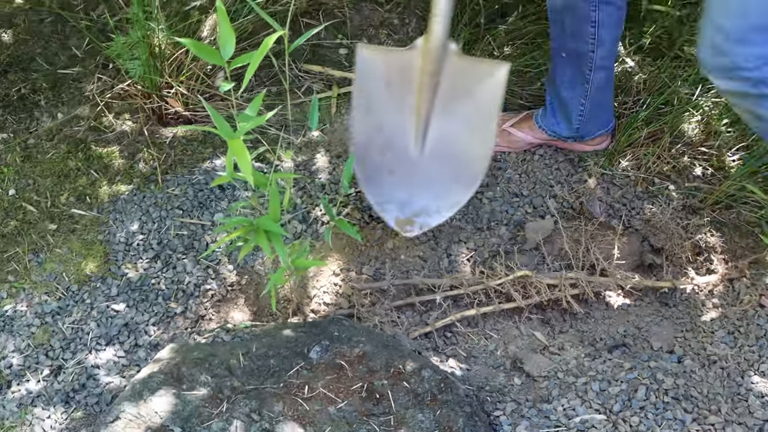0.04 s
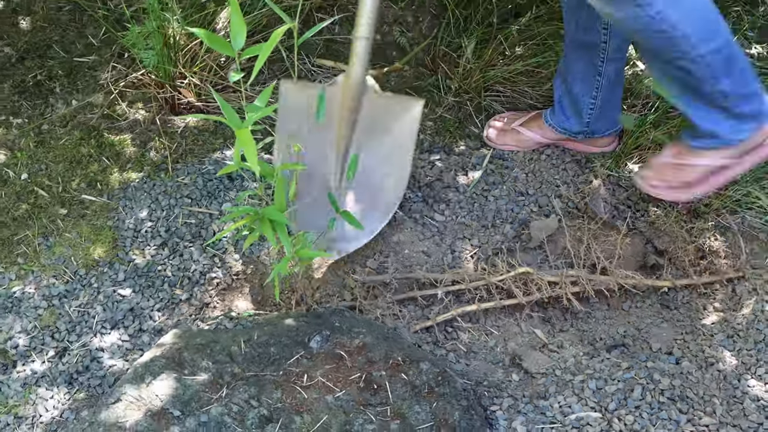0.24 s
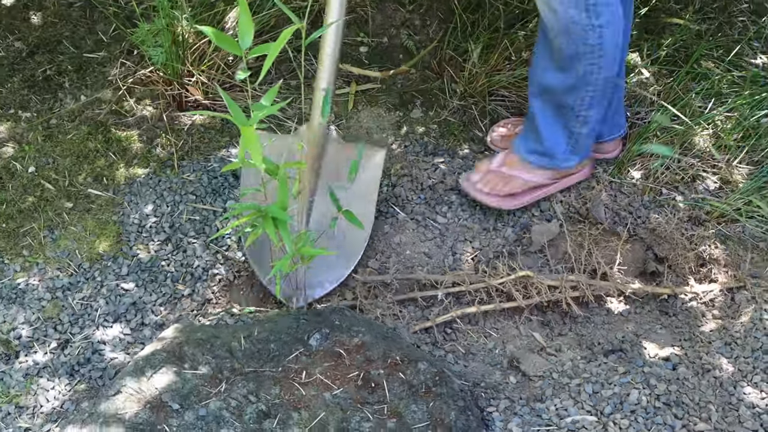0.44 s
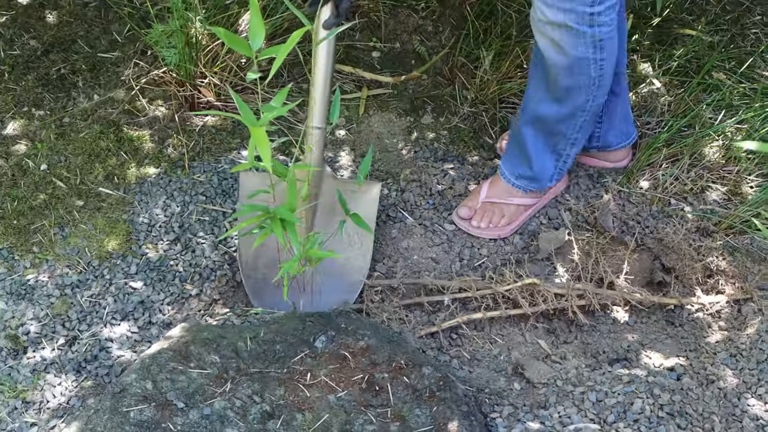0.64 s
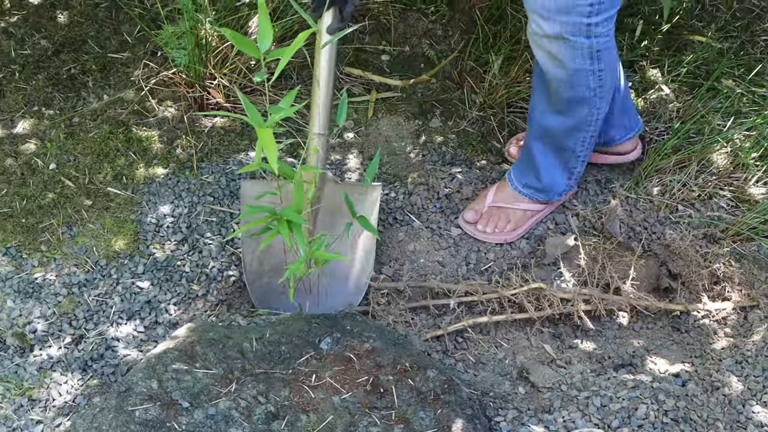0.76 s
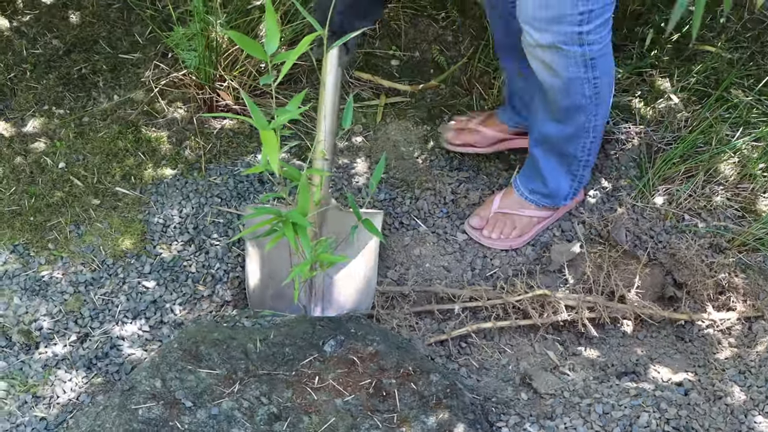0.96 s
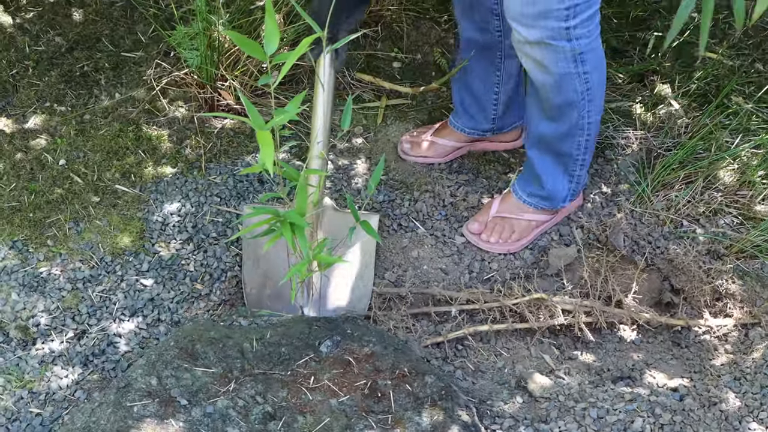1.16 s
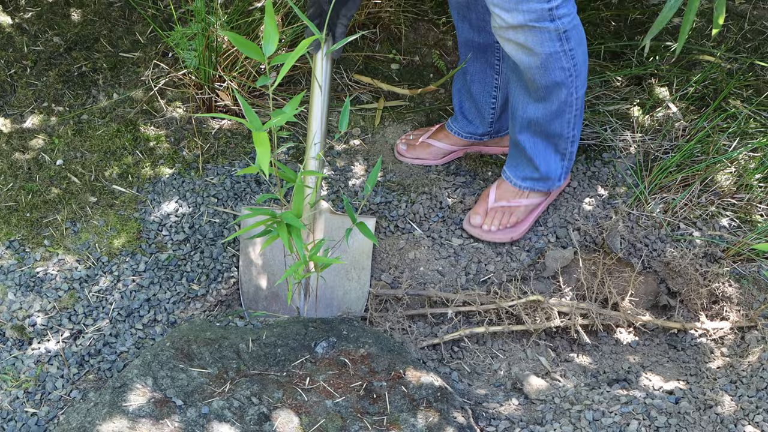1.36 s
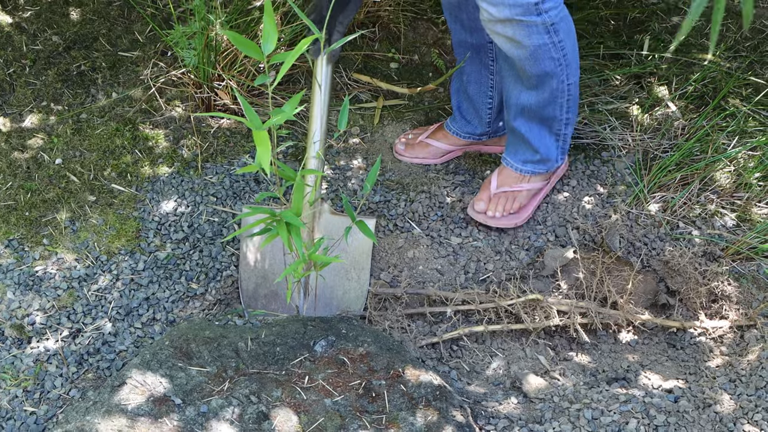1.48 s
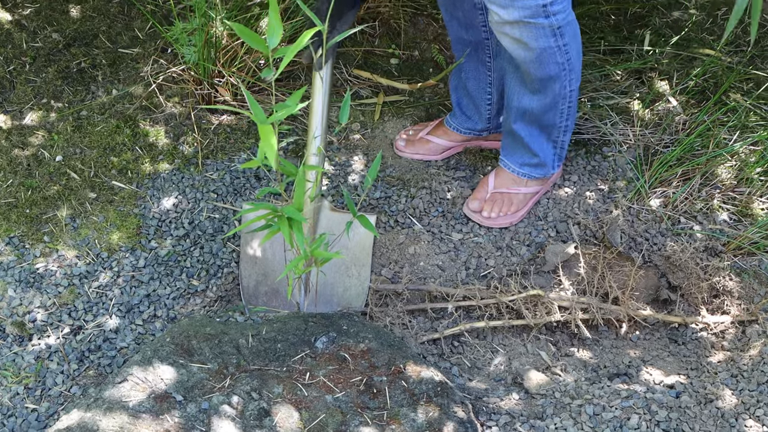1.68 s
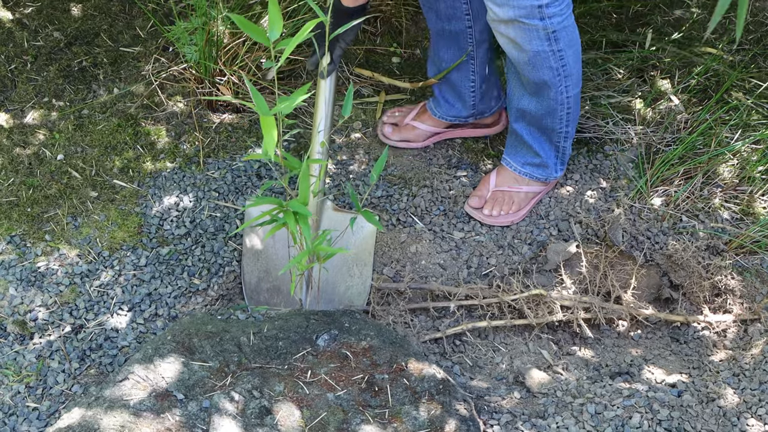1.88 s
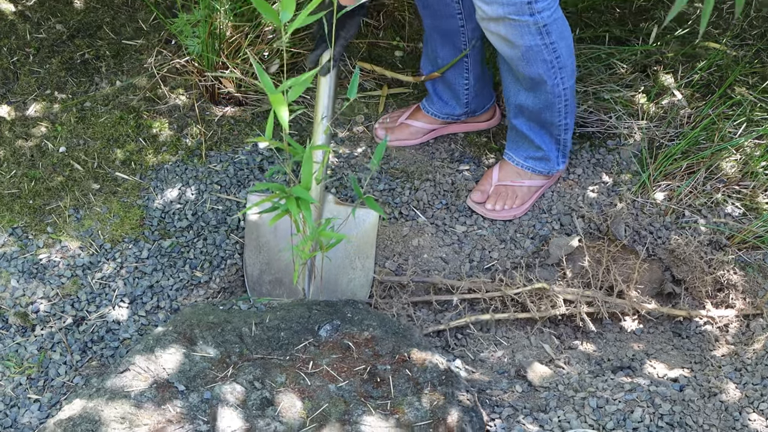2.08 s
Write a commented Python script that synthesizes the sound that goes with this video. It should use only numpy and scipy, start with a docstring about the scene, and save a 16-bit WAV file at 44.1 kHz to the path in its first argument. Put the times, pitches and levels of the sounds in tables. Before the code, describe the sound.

A steel spade scrapes and bites into gravelly soil, stones knocking and crunching under shifting feet

```python
"""In a garden, a steel spade is set on gravelly soil and pushed in as sandalled feet shift on the gravel.
Random grit clicks ring the blade's modes under a treble hiss and a low push of soil; the gravel
crunches as many small ringing contacts; stones knock as a ring, a snap and a scatter of grit.
Sprays are coloured clicks that die away. Soft low thuds, a sandal's creak and a bright clack of blade
on stone are added, over shaped noise for the faint air."""
import sys
import numpy as np
from scipy import signal
from scipy.fft import rfft, irfft, next_fast_len
from scipy.io import wavfile
from scipy.ndimage import uniform_filter1d

SR = 44100
rng = np.random.default_rng(int(sys.argv[2]) if len(sys.argv) > 2 else 0)


def makeup_ratio(level_db):
    """Linear amplitude ratio for a level in decibels (20 dB per factor of ten)."""
    decades = np.asarray(level_db, float) / 20
    return 10 ** decades


def file_out(sig):
    """Save sig as 16-bit WAV at sys.argv[1]."""
    # one column per channel
    cols = np.atleast_2d(sig).T
    # limit, then scale
    lim = np.clip(cols, -1, 1)
    pcm = np.round(lim * 32767).astype(np.int16)
    wavfile.write(sys.argv[1], SR, pcm)


N = 93492  # length in samples


def colour(x, points):
    """Causal (minimum-phase) filter with the given dB, interpolated over log frequency."""
    size = next_fast_len(N + 8192)
    hz = np.maximum(np.arange(size // 2 + 1) * SR / size, 1)
    p = np.array(points, float)
    log_gain = np.interp(np.log(hz), np.log(p[:, 0]), p[:, 1]) * np.log(10) / 20
    # folding the cepstrum onto positive time gives minimum phase
    cepstrum = irfft(log_gain, size)
    cepstrum[1:size // 2] *= 2
    cepstrum[size // 2 + 1:] = 0
    return irfft(rfft(x, size) * np.exp(rfft(cepstrum)), size)[:N]


def rms_one(x):
    """Scale to unit rms."""
    return x / np.sqrt(np.mean(x ** 2) + 1e-20)


def in_time(rows):
    """Table columns as signals, in straight lines between the rows."""
    s, *columns = np.transpose(rows)
    return [np.interp(np.arange(N) / SR, s, c) for c in columns]


def grains(per_s, spread_db):
    """Random clicks of uneven size and sign."""
    sizes = makeup_ratio(spread_db * np.minimum(rng.exponential(1, N), 5))
    signs = rng.choice([-1, 1], N)
    return sizes * signs * (rng.random(N) < per_s / SR) + 1e-18


def ring(clicks, hz, t60):
    """Two-pole resonance: a unit click starts a sine of height 1 that falls 60 dB in t60 seconds."""
    r, w = makeup_ratio(-60 / (t60 * SR)), 2 * np.pi * hz / SR
    return signal.lfilter([0, np.sin(w)], [1, -2 * r * np.cos(w), r * r], clicks)


def band(x, low_hz, high_hz):
    """Butterworth band-pass, rms 1."""
    sos = signal.butter(2, [low_hz, high_hz], "band", fs=SR, output="sos")
    return rms_one(signal.sosfilt(sos, x))


def wander(span_s):
    """Smooth chance of spread 1 that changes over span_s."""
    size = int(span_s * SR)
    return rms_one(uniform_filter1d(uniform_filter1d(rng.standard_normal(N), size), size))


def clumps(span_s=.003):
    """Gain that wanders with a spread of 2.5 dB, so that grit comes in clumps."""
    return makeup_ratio(2.5 * wander(span_s))


# Spectrum of the garden air. Each row: frequency in Hz, relative level in dB.
AIR_SPECTRUM = [(25, -8), (60, 15), (150, 11), (320, -5.5), (600, 12), (1200, -10), (4000, -2.5),
                (15000, -48)]


def garden_air():
    """Steady noise, shaped to the faint air of the garden."""
    return makeup_ratio(-56) * rms_one(colour(rng.standard_normal(N), AIR_SPECTRUM))


# Strokes of the blade, one list each.
# Each row: time in seconds, rasp level in dB, treble level in dB, soil level in dB.
BLADE_STROKES = [
    [(0, -33.5, -46, -64), (.012, -36.5, -39, -53), (.05, -42.5, -52, -40), (.08, -63, -60, -53)],
    [(.634, -53, -70, -73), (.6405, -32, -41.5, -64), (.657, -35.5, -51, -68), (.68, -44.5, -51, -53),
     (.684, -36, -38.5, -73), (.725, -35.5, -47.5, -47.5), (.768, -41.5, -59, -54), (.779, -46, -76, -58)],
    [(.885, -40.5, -52, -62), (.9, -35.5, -41.5, -47), (.925, -24.5, -26, -34.5), (.933, -19, -24.5, -25),
     (.942, -17.5, -21.5, -30), (.95, -12, -16.5, -19), (.958, -12.5, -21.5, -24), (.968, -28, -22, -22),
     (.974, -19, -27, -32), (.98, -51, -33, -37), (.995, -73, -48, -58)],
]
# Modes of the steel, low to high. Each row: frequency in Hz, width in Hz, relative level in dB.
BLADE_MODES = [(1330, 35, 2), (1520, 80, -1), (1770, 85, -8), (2380, 50, -6), (2640, 50, -3),
               (3010, 100, -6), (3500, 90, -4), (3760, 50, -5), (4060, 70, -3), (5700, 80, -5),
               (7070, 45, -5), (7820, 80, -6)]
# The mode region driven hardest, moving as the blade tilts. Each row: time in seconds, centre in Hz.
TILT_FOCUS = [(.02, 4060), (.645, 2600), (.69, 3760), (.72, 2560), (.765, 2380), (.9, 2460), (.93, 4100),
              (.95, 1410)]
# Spectrum of the soil being pushed. Each row: frequency in Hz, relative level in dB.
SOIL_SPECTRUM = [(60, -30), (150, -13), (230, -3.5), (400, -15), (700, -2), (1000, -8.5), (1300, -21.5)]


def blade():
    """Dense grit drags over the steel: modes ring, the treble hisses, the soil gives below."""
    focus_db, focus_octaves = 7, 0.16
    shift_s = .02  # the contact shifts between modes
    levelling = .4  # 0 leaves the rasp as it is, 0.5 would level its short-term power fully
    t, gains = np.arange(N) / SR, np.zeros((3, N))
    for rows in BLADE_STROKES:
        inside = (t >= rows[0][0]) & (t < rows[-1][0])
        gains += inside * makeup_ratio(np.array(in_time(rows)))
    rasp_gain, treble_gain, soil_gain = gains

    grit = grains(3000, spread_db=2.8) * clumps()
    focus, = in_time(TILT_FOCUS)
    modes = []
    for hz, width, db in BLADE_MODES:
        drive = grit * rng.standard_normal(N) * clumps(shift_s)
        t60 = np.log(1000) / (np.pi * width)
        boost_db = focus_db * np.exp(-(np.log2(hz / focus) / focus_octaves) ** 2)
        modes.append(makeup_ratio(db + boost_db) * rms_one(ring(drive, hz, t60)))

    rasp = rms_one(sum(modes[:9])) + makeup_ratio(-4) * band(grit, 1100, 4600)
    # partly level the rasp by its short-term power, so that it follows the stroke levels
    short_term_power = uniform_filter1d(rasp ** 2, int(shift_s * SR / 2))
    rasp = rasp / short_term_power ** levelling
    hiss = band(grains(9000, spread_db=2.5) * clumps(), 4500, 13000)
    treble = makeup_ratio(-8) * rms_one(sum(modes[9:])) + hiss
    soil = rms_one(colour(grains(1500, spread_db=2.1), SOIL_SPECTRUM + [(4000, -53)]))
    return rasp_gain * rms_one(rasp) + treble_gain * rms_one(treble) + soil_gain * soil


def stones(per_s, low_hz, high_hz, cycles, spread_db):
    """Random contacts dealt to 14 sizes of stone, each ringing down 60 dB in a number of cycles."""
    clicks, dealt = grains(per_s, spread_db), rng.integers(0, 14, N)
    total = np.zeros(N)
    for k, hz in enumerate(np.geomspace(low_hz, high_hz, 14)):
        total += ring(clicks * (dealt == k) + 1e-18, hz, cycles / hz)
    return rms_one(total)


# Gravel under the feet.
# Each row: time in seconds, coarse stones in dB, small stones in dB, treble in dB.
GRAVEL_LEVELS = [(0, -34, -50.5, -53), (.14, -46, -43.5, -60), (.17, -58, -59, -67),
                 (.34, -61.5, -65.5, -61.5), (.412, -56, -45, -43), (.48, -79, -61, -60),
                 (.86, -60, -54.5, -59.5), (1.0, -45, -47.5, -44.5), (1.1, -55, -54.5, -58.5),
                 (1.26, -54.5, -45, -53), (1.38, -44.5, -51.5, -54), (1.44, -54.5, -54, -60.5),
                 (1.58, -49, -49, -48), (1.67, -55.5, -57, -61), (1.77, -59, -52.5, -56.5),
                 (1.83, -37.5, -48.5, -55), (1.95, -48.5, -42, -48.5), (2.06, -47.5, -51.5, -51.5),
                 (2.12, -61, -58.5, -57)]
# Low rumble of shifting soil. Each row: time in seconds, level in dB.
RUMBLE_LEVELS = [(0, -59), (.14, -47.5), (.5, -62.5), (1.02, -47.5), (1.6, -56), (1.86, -52.5)]


def crunch():
    """The gravel bed shifts under weight: stones of three ranges ring, with fine grit on top."""
    coarse_db, small_db, treble_db = in_time(GRAVEL_LEVELS)
    rumble_db, = in_time(RUMBLE_LEVELS)
    rumble = stones(300, 281, 438, cycles=13.0, spread_db=1.5)
    coarse = stones(870, 502, 1013, cycles=8.4, spread_db=3.0)
    small = stones(1400, 1000, 4010, cycles=14.0, spread_db=2.0)
    treble = band(grains(6100, spread_db=3.07) * clumps(), 2000, 19000)
    low = makeup_ratio(rumble_db) * rumble + makeup_ratio(coarse_db) * coarse
    return low + makeup_ratio(small_db) * small + makeup_ratio(treble_db) * treble


# Stones knocking; two stones that meet share a moment.
# Each row: start in seconds, level in dB before the low cut, pitch in Hz.
STONE_KNOCKS = [(.0248, -17.5, 1370), (0.0253, -20, 3380), (0.0242, -17.5, 464), (.049, -23.5, 735),
                (0.1056, -24, 1360), (.1063, -17.5, 2990), (.1104, -22.5, 1190), (.1298, -23.5, 3490),
                (0.2281, -39, 1760), (0.2855, -26.5, 930), (.3988, -21.5, 1130), (0.4043, -31, 2180),
                (0.9329, -13.5, 900), (.9645, -11, 1110), (0.971, -14, 847), (1.007, -41, 2040),
                (1.1136, -38, 1600), (1.148, -30.5, 1330), (1.243, -30, 1690), (1.2494, -32.5, 2700),
                (1.285, -43, 4000), (1.3063, -26.5, 860), (1.3076, -33.5, 4140), (1.317, -31, 1190),
                (1.339, -35.5, 1050), (1.3574, -22, 850), (1.382, -26, 940), (1.3845, -20.5, 796),
                (1.3958, -27, 2230), (1.397, -34, 4000), (1.414, -24.5, 2090), (1.414, -31.5, 4150),
                (1.436, -39, 2190), (1.464, -22.5, 990), (1.464, -33, 3750), (1.498, -34.5, 3180),
                (1.518, -35.5, 3370), (1.57, -28, 3320), (1.5865, -16.5, 710), (1.587, -21, 396),
                (1.588, -25, 2920), (1.805, -25.5, 1040), (1.8733, -17, 480), (1.93, -18, 710),
                (1.9555, -19, 640), (1.9554, -29, 3870), (1.974, -35, 3200), (1.9927, -23.5, 710),
                (1.994, -32.5, 2920), (2.0309, -17, 680), (2.034, -18.5, 3360)]


def knocks():
    """Each stone gives a broad snap, a short ring, and a scatter of grit after it."""
    ring_t60_s, snap_t60_s, scatter_t60_s = 0.0097, .003, 0.05
    snap_db, scatter_db = -9, -14.5
    contact_cycles = 0.086  # softens the onset of the ring
    out, t = np.zeros(N + SR), np.arange(2400) / SR

    def fade(t60):
        return makeup_ratio(-60 * t / t60)

    for s, db, hz in STONE_KNOCKS:
        onset = 1 - np.exp(-t * hz / contact_cycles)
        sound = onset * fade(ring_t60_s) * np.sin(2 * np.pi * hz * t)
        snap, scatter = rng.standard_normal((2, len(t)))
        sound += makeup_ratio(snap_db) * fade(snap_t60_s) * band(snap, hz / 2, hz * 2.3)
        sound += makeup_ratio(scatter_db) * fade(scatter_t60_s) * band(scatter, hz * 0.91, hz * 1.28)
        i = int(s * SR)
        out[i:i + len(t)] += makeup_ratio(db) * sound * rng.choice([-1, 1])
    low_cut = signal.butter(2, 300, "high", fs=SR, output="sos")
    return signal.sosfilt(low_cut, out[:N])


# Sprays of fine grit. Each row: start in seconds, level at the start in dB,
# time to fall 60 dB in seconds, share of the finest sand from 0 to 1.
GRIT_SPRAYS = [(0.352, -39, 0.022, 0), (0.4, -32.5, 0.12, 1), (0.824, -34.5, 0.089, 0.03),
               (1.17, -46, 0.14, 1), (1.304, -38, 0.1, 1), (1.461, -36.5, 0.14, 0.7),
               (1.955, -32, 0.029, 0.97), (2.036, -27.5, 0.13, 0.49), (2.069, -40, 0.028, 1)]
# Spectrum of the sprayed grit. Each row: frequency in Hz, relative level in dB.
SPRAY_SPECTRUM = [(800, 3), (2500, 2.5), (4000, 7), (6000, 10.5), (12000, 11.5), (15500, 8)]


def sprays():
    """Fine grit is thrown up and patters out; only the finest sand reaches the top octave."""
    rise_s = .0006
    t, out = np.arange(N) / SR, np.zeros(N)
    grit = rms_one(colour(grains(12000, spread_db=2.5), SPRAY_SPECTRUM))
    dull = signal.sosfilt(signal.butter(4, 10000, fs=SR, output="sos"), grit)
    for s, db, t60, fine in GRIT_SPRAYS:
        rise = np.clip((t - s) / rise_s, 0, 1)
        fall = makeup_ratio(db - 60 * np.maximum(t - s, 0) / t60)
        out += rise * fall * (dull + fine * (grit - dull))
    return out


# Weight landing. Each row: start in seconds, level at the start in dB,
# pitch in Hz, time to fall 60 dB in seconds.
SOIL_THUDS = [(0.955, -36, 74, 0.2), (1.695, -41, 76, 0.15)]


def thuds():
    """Weight lands on the soil: low sines that die away."""
    out = np.zeros(N)
    for s, db, hz, t60 in SOIL_THUDS:
        since = np.maximum(np.arange(N) / SR - s, 0)
        out += makeup_ratio(db - 60 * since / t60) * np.sin(2 * np.pi * hz * since)
    return out


def creak():
    """A sandal creaks: uneven slips ring one hollow resonance."""
    start_s, length_s = 1.688, .08
    t = np.arange(N) / SR
    slips = grains(600, spread_db=1) * (t > start_s) * (t < start_s + length_s)
    return makeup_ratio(-52) * ring(slips + 1e-18, hz=835, t60=.035)


def clack():
    """The blade meets a stone: a hard, bright crack with a short high ring."""
    start_s, t60_s, start_db, ring_hz = 2.031, .014, -17.5, 5920
    t = np.maximum(np.arange(N) / SR - start_s, 0)
    crack = band(rng.standard_normal(N), 1100, 16000)
    high_ring = np.sin(2 * np.pi * ring_hz * t)
    return makeup_ratio(start_db - 60 * t / t60_s) * (t > 0) * (crack + high_ring)


def scene():
    """All sources, dry in the open air, as one channel."""
    spade = blade() + clack()
    gravel = crunch() + knocks() + sprays()
    feet = thuds() + creak()
    return (garden_air() + spade + gravel + feet)[None]


def roll_off(x):
    """The treble ends steeply here."""
    return signal.sosfilt(signal.butter(12, 16510, fs=SR, output="sos"), x)


# Response of the microphone. Each row: frequency in Hz, gain in dB.
MIC_RESPONSE = [(20, -16), (2500, -1), (3700, 0.5), (4200, 1.5), (4650, -7.5), (5500, -2.5), (15300, -4.5),
                (16000, -16), (16800, -94)]


def record(dry):
    """A small microphone with a presence peak colours the sound."""
    mix = colour(dry[0], MIC_RESPONSE)[None]
    return roll_off(mix)


dry = scene()
out = record(dry)
file_out(out)
```